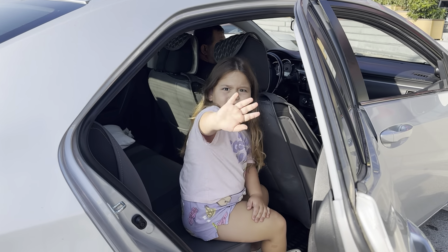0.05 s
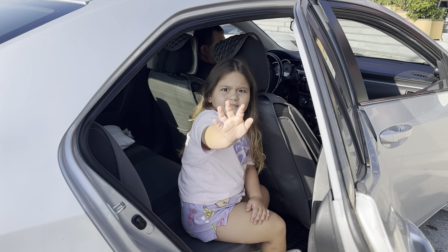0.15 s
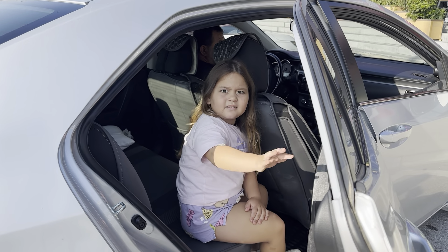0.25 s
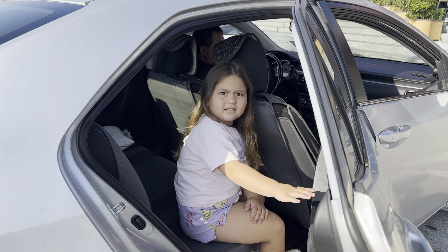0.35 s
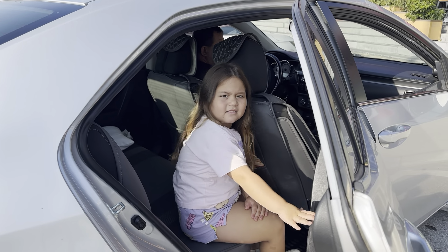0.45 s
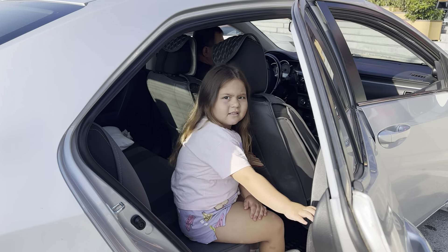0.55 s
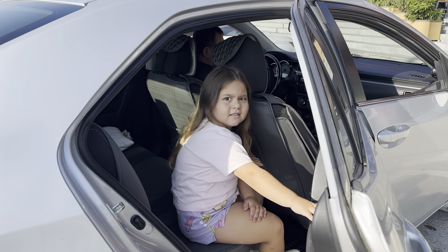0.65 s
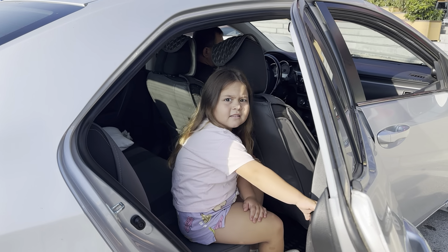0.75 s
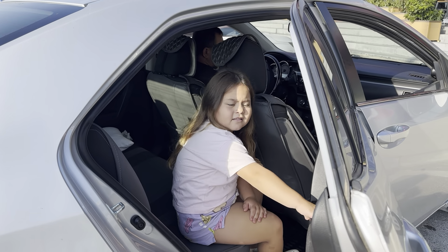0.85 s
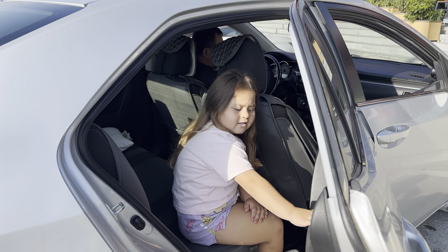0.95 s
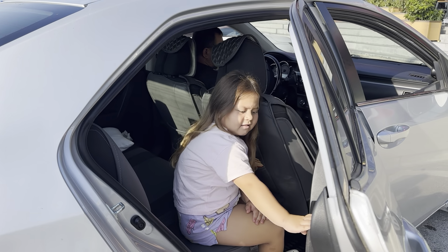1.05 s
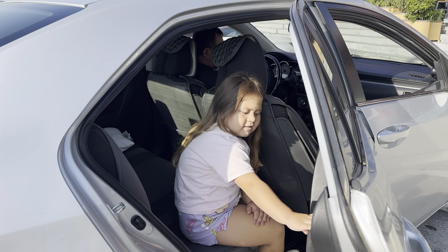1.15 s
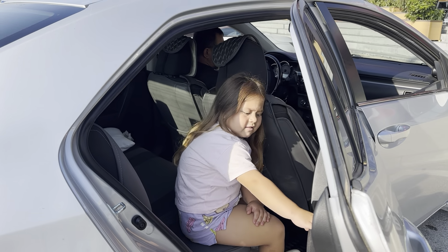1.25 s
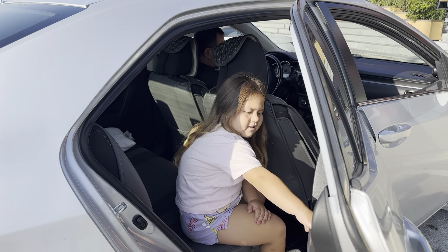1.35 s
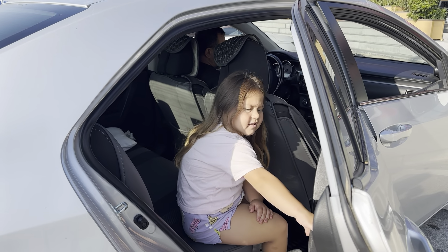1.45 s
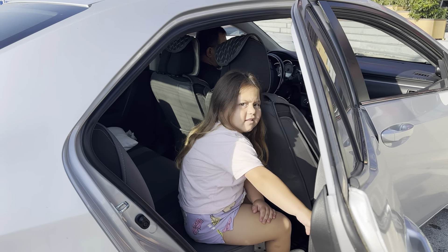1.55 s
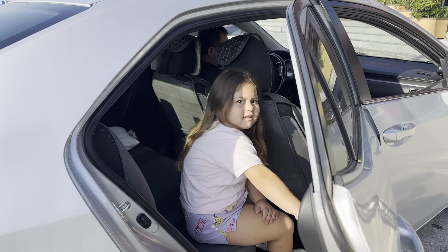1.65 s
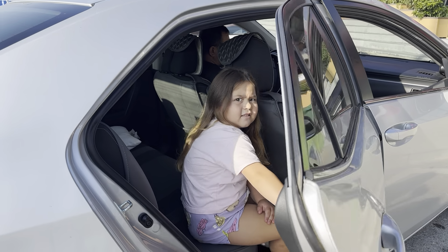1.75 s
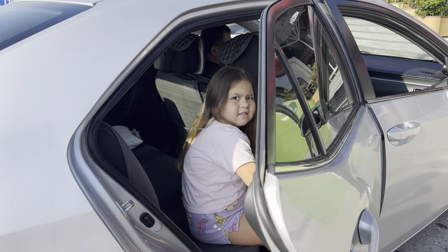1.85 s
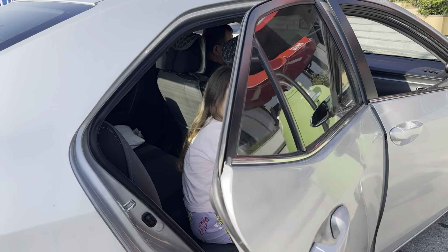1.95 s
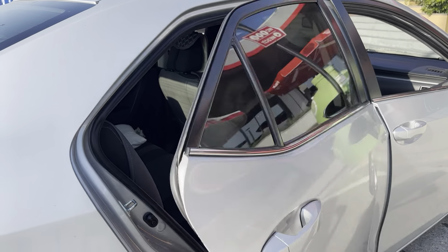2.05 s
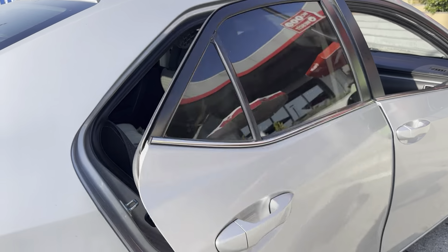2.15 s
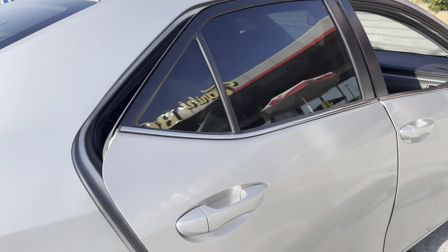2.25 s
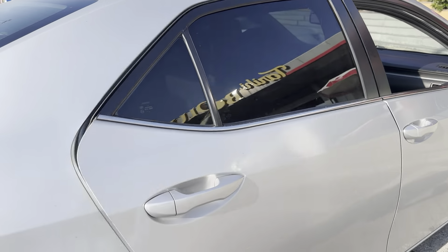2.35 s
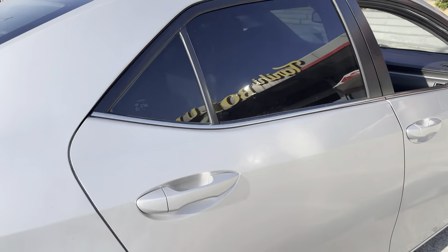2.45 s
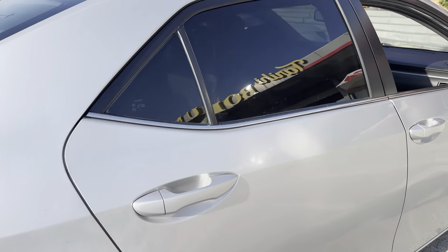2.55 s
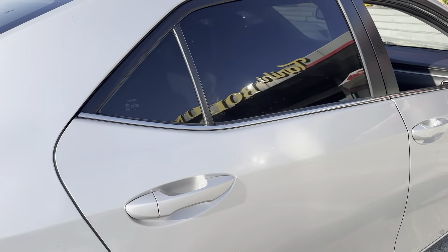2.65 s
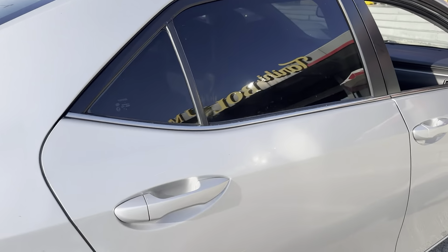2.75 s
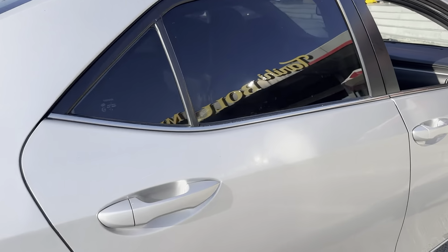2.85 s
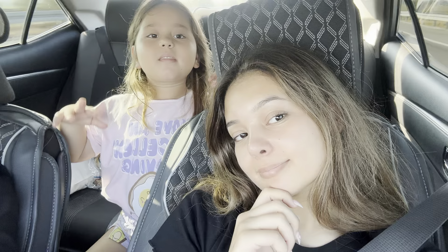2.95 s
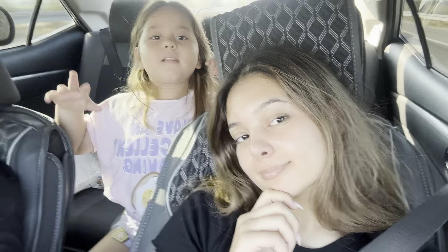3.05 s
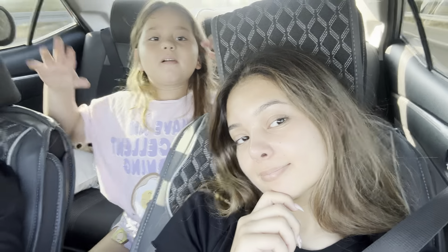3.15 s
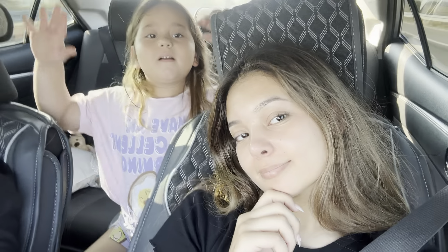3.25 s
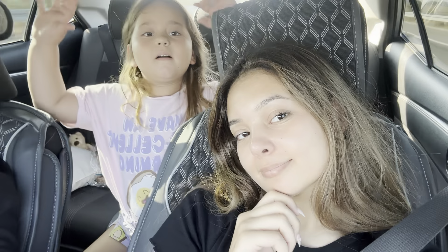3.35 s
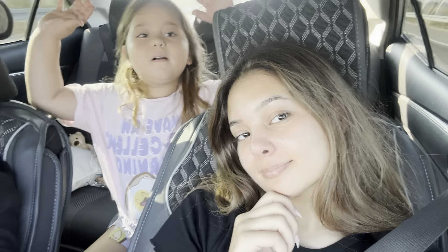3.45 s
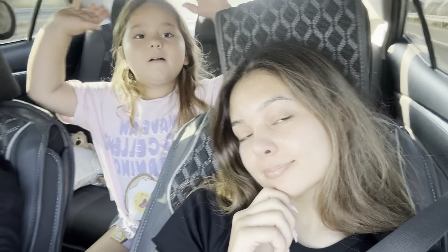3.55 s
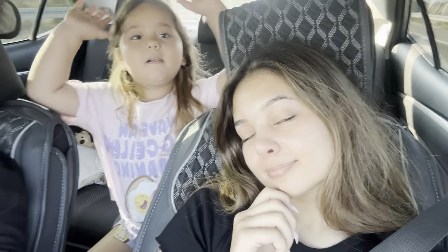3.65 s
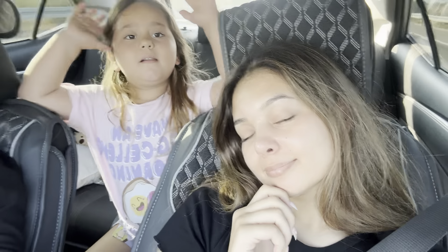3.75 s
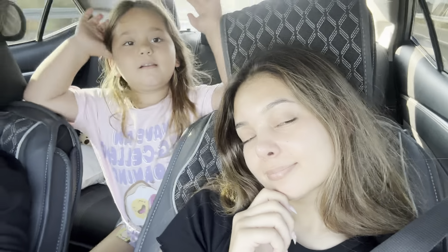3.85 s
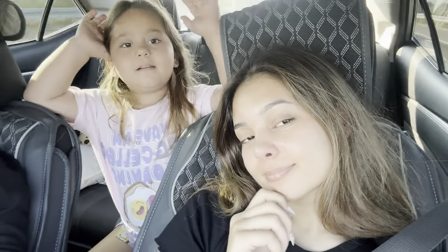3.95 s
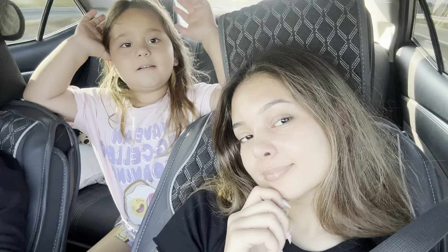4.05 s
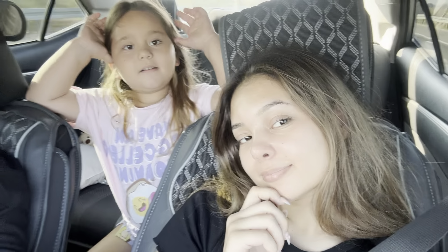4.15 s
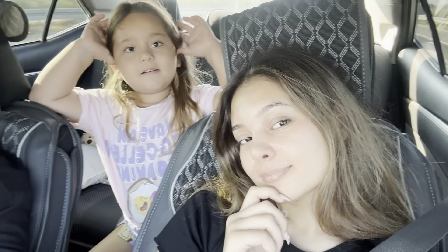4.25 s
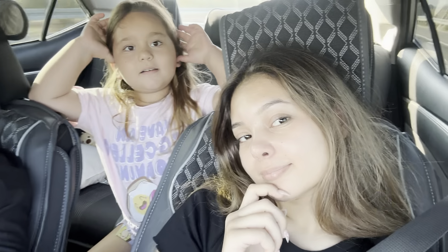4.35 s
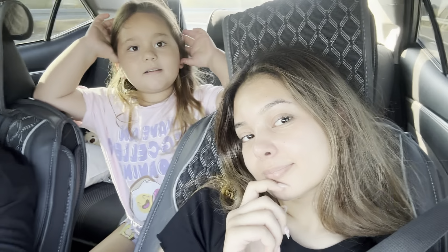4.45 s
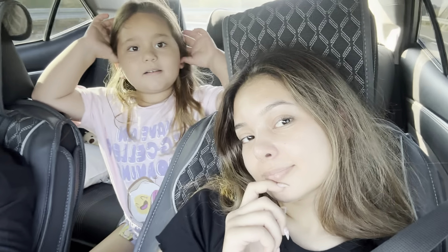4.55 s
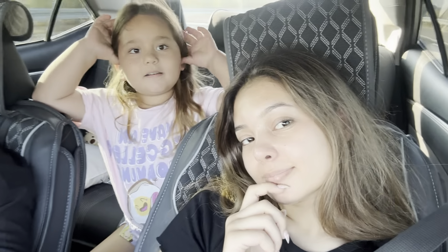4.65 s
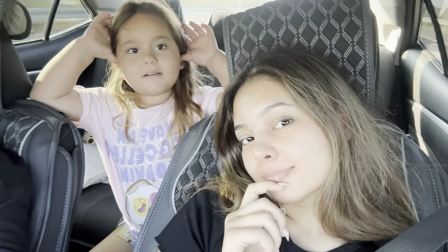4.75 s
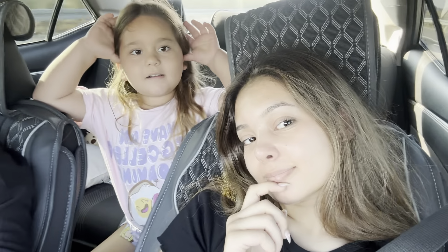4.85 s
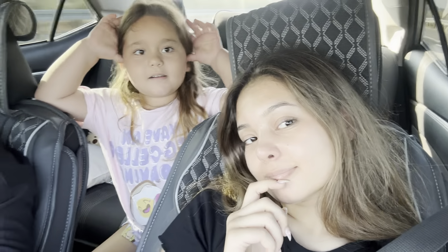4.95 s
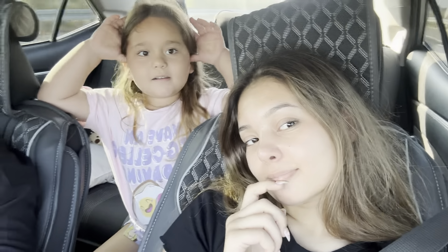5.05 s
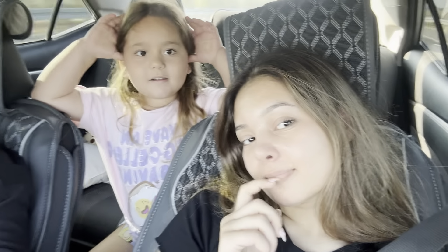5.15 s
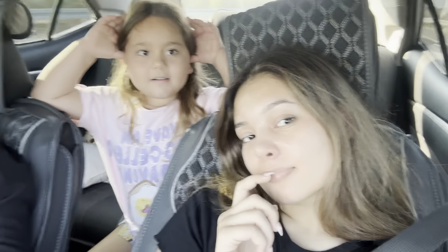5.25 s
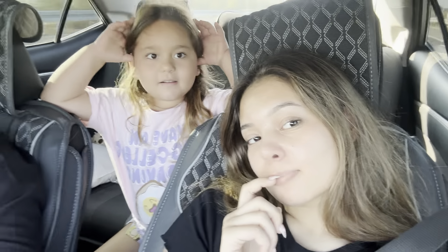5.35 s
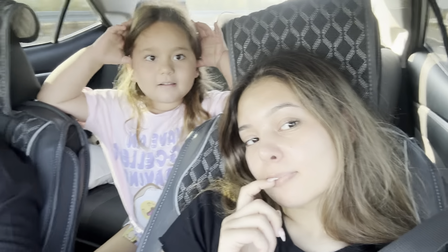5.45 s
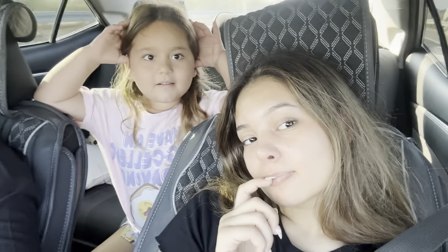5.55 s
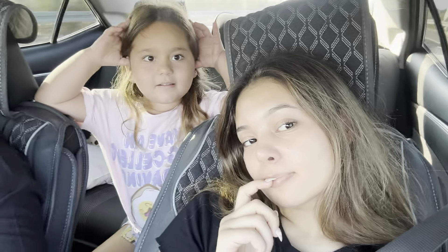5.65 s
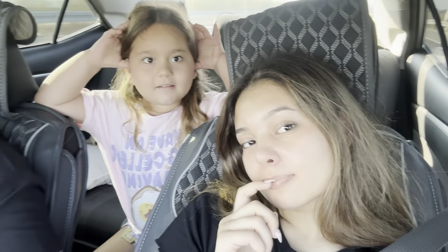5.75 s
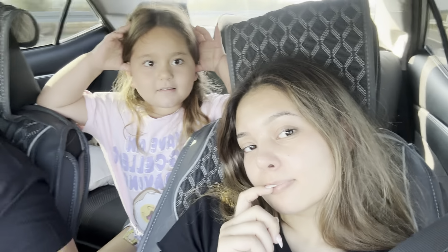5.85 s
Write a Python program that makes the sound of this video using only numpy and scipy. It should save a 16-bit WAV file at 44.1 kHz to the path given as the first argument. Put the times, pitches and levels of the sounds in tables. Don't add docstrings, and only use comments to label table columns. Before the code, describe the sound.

Open-air stereo beside a car: low wind buffeting at first, then a subdued background of far traffic and airy machinery. Small dry clicks lead to a close, dense metal-and-rubber door thud, dying quickly. About half a second later the sound jumps inside the cabin, much louder and continuously bass-heavy, with low engine drone, irregular floor thumps, tyre rumble and soft window wind until the end.

```python
import sys
import numpy as np
from scipy import signal
from scipy.fft import rfft, irfft, next_fast_len
from scipy.io import wavfile
from scipy.ndimage import uniform_filter1d

SR = 44100
rng = np.random.default_rng(int(sys.argv[2]) if len(sys.argv) > 2 else 0)


def convert_level_to_amplitude(level_db):
    exponent = np.asarray(level_db, float) / 20
    return 10 ** exponent


def master_out(mix):
    frames = np.transpose(np.atleast_2d(mix))
    ceiling = np.clip(frames, -1, 1)
    pcm = np.round(ceiling * 32767).astype(np.int16)
    wavfile.write(sys.argv[1], SR, pcm)


N = 259647
T = np.arange(N) / SR
CUT_S = 3.0362

# hz, level_db_per_hz
RUMBLE_SPECTRUM = [(15, -49), (25, -15), (59, 5), (92, 5), (336, -16.5), (377, -12.5), (400, -39),
                   (520, -57), (880, -120)]
# hz, level_db_per_hz
TRAFFIC_SPECTRUM = [(120, 5), (200, -4), (339, -8), (373, -11.5), (471, -1), (512, -9.5), (936, -6.5),
                    (2500, -21.5), (3250, -34.5), (5500, -120)]
# hz, level_db_per_hz
FAR_HISS_SPECTRUM = [(1500, -7), (2500, -3), (3500, 3.5), (4400, 6.5), (5500, 2), (7500, 0.5), (9500, 2),
                     (12000, -13.5), (15500, -5.5), (17000, -35.5)]
# pitch_hz, width_hz, level_db
YARD_TONES = [(496, 200, -63), (817, 51, -63.5), (1535, 29, -62), (4190, 200, -71.5), (4680, 59, -68.5)]
# hz, share
OUTDOOR_LIKENESS = [(60, 0.93), (240, 0.76), (480, 0.4), (950, 0.021), (1900, 0.11), (3800, 0.59),
                    (7500, 0.31)]
# time_s, level_db
BREEZE = [
    (0.0, -28),
    (0.13, -40.5),
    (1.33, -40),
    (2.01, -44),
    (2.3, -42),
    (2.76, -46.5),
    (2.93, -42),
]
# centre_s, peak_db, pitch_hz
GUSTS = [(.012, -24, 185), (0.022, -17.5, 196), (.029, -16, 123), (.045, -20, 59), (.113, -23.5, 87),
         (0.16, -19.5, 138), (.235, -30.5, 55), (.3, -33, 60), (.42, -23, 92), (.745, -30, 71),
         (1.2, -35.5, 250), (1.238, -23.5, 100), (1.613, -36, 70), (2.26, -32, 75), (2.335, -33, 55),
         (2.78, -37, 42), (2.88, -27, 70)]

# hz, level_db_per_hz
BOOM_SPECTRUM = [(12, -44), (20, -17), (43, 1), (97, 1), (145, -1.5), (189, -3.5), (216, -20.5),
                 (271, -18.5), (300, -23), (390, -34), (660, -120)]
# hz, level_db_per_hz
ROAR_SPECTRUM = [(130, -39), (220, 1), (278, -0.5), (308, 2), (653, -2.5), (1360, -14.5), (1720, -20),
                 (1880, -25), (2190, -27.5), (2500, -33.5), (3250, -64.5), (5500, -120)]
# hz, level_db_per_hz
WIND_SPECTRUM = [(1300, -21.5), (2000, -13.5), (2800, -7.5), (4000, -11), (5500, -15.5), (7500, -21),
                 (9500, -24.5), (12000, -32.5), (14500, -40.5), (15800, -50)]
# pitch_hz, width_hz, level_db
CABIN_TONES = [(58, 30, -27), (110.7, 12, -25.5), (197, 18, -50.5), (242.7, 9, -41), (307.5, 15, -45),
               (484, 31, -56.5), (931, 150, -44.5), (3830, 800, -65), (1417, 6.7, -56)]
# pitch_hz, width_hz, level_db
LEAK = [(11800, 3100, -77.5)]
# hz, share
CABIN_LIKENESS = [(60, 1), (130, 0.92), (240, 0.76), (480, 0.17), (1000, 0.56), (2000, 0.2), (4000, 0.18),
                  (8000, 0.021)]
# centre_s, peak_db, pitch_hz
JOINTS = [(3.042, -6, 104), (3.087, -8, 105), (3.196, -8.5, 109), (3.302, -10, 91), (3.379, -10.5, 112),
          (3.475, -7.5, 101), (3.711, -14, 109), (3.766, -5, 123), (3.884, -5.5, 111), (4.067, -9.5, 116),
          (4.142, -10, 89), (4.293, -5, 132), (4.356, -12, 109), (4.54, -12.5, 95), (4.743, -12, 84),
          (4.796, -17, 103), (4.882, -7, 110), (5.011, -4, 95), (5.203, -9, 98), (5.235, -11, 115),
          (5.298, -9, 109), (5.342, -10, 95), (5.449, -4.5, 100), (5.587, -8, 104), (5.655, -7.5, 70),
          (5.865, -8, 82)]
# time_s, level_db
ROAD = [
    (3.1, 1.2),
    (3.9, 1.85),
    (4.3, 0.2),
    (4.8, 2.2),
    (5.45, 1.7),
    (5.85, 3),
]
# time_s, level_db
AIRFLOW = [
    (3.1, 1.7),
    (3.8, 0),
    (4.3, 1),
    (4.7, 1.8),
    (5.05, 2),
    (5.3, 1),
    (5.85, 2.3),
]
# time_s, firing_hz
SPEED = [
    (3.1, 92.2),
    (4.0, 92),
    (5.0, 94.43),
    (5.85, 94.35),
]
# time_s, level_db
FIRING_LOAD = [(3.1, -21.5), (3.3, -15.5), (3.55, -21), (3.8, -16), (3.97, -24), (4.15, -18), (4.4, -15.5),
               (4.6, -21), (4.78, -20.5), (5.03, -16.5), (5.2, -21), (5.45, -15.5), (5.62, -17),
               (5.85, -16.5)]
CRUISE_HZ, DB_PER_HZ = 92.1, 0.42

# pitch_hz, width_hz, level_db
CASE = [(3100, 1500, 20), (9500, 3000, 8), (15200, 1500, 13)]
# peak_s, peak_db
RUBS = [
    (1.218, -42.5),
    (1.295, -61),
]
# start_s, peak_db
SNAPS = [
    (2.4442, -24),
    (2.4468, -20.5),
    (2.4505, -30),
    (2.849, -54),
]
# pitch_hz, width_hz, level_db, t60_s
SNAP_BODY = [(3440, 860, -3.5, 0.031), (9800, 9100, 3.5, 0.015), (14700, 3200, -3, 0.02)]
# start_s, peak_db
SLIPS = [
    (1.5456, -33),
    (1.5535, -38),
    (1.5558, -42),
    (1.5578, -37),
    (1.5595, -38),
    (1.5655, -39),
    (1.5742, -36),
    (1.579, -44),
    (1.587, -45),
    (1.592, -44),
]
# pitch_hz, width_hz, level_db, t60_s
SPRING_BODY = [(3820, 690, 4, 0.02), (4870, 900, -6, 0.024), (6300, 970, -2, 0.034),
               (9200, 3300, -11, 0.089)]
# start_s, peak_db
KNOCKS = [
    (1.5607, -21),
    (1.5635, -30),
    (1.5677, -30),
    (1.5755, -36),
]
# pitch_hz, width_hz, level_db, t60_s
HINGE_BODY = [(503, 220, -1, 0.025), (293, 140, -10.5, 0.19), (1210, 1100, -12.5, 0.1),
              (3880, 1900, -19.5, 0.37)]
# start_s, peak_db
SETTLES = [
    (2.4465, -20),
    (2.455, -22),
    (2.4605, -21),
    (2.4715, -29),
    (2.4925, -29),
    (2.4965, -26),
    (2.515, -36),
]
# pitch_hz, width_hz, level_db, t60_s
PAWL_BODY = [(925, 350, -1, 0.027), (1400, 330, -2, 0.03), (1830, 500, -6, 0.023)]

# start_s, level_db
SEAL_HITS = [
    (2.4125, -19),
    (2.4175, -8.5),
    (2.453, -12.5),
]
# start_s, level_db
LATCH_HITS = [
    (2.4079, -29),
    (2.4229, -13.5),
    (2.4252, -14.5),
    (2.4271, -7.5),
    (2.441, -23.5),
    (2.449, -20),
    (2.457, -29),
]
# start_s, level_db
FRAME_HITS = [
    (2.4456, -6),
    (2.454, -13.5),
    (2.4645, -22),
    (2.482, -23),
    (2.492, -19),
    (2.511, -38),
]
# hz, level_db
SEAL_COLOUR = [(150, -34), (250, -27), (400, -2), (600, 3.5), (800, -11), (1150, -13.5), (7000, -31)]
# hz, level_db
LATCH_COLOUR = [(150, -19), (230, -10), (380, -5.5), (750, -3), (1150, 0.5), (1600, -3.5), (7000, -15.5)]
# hz, level_db
FRAME_COLOUR = [(60, 8), (150, -3), (280, -3), (480, -15.5), (1150, -21.5), (3000, -24), (8000, -30.5)]
# pitch_hz, level_db, t60_s
DOOR_MODES = [(59, -14, 0.22), (91, -14, 0.098), (144, -14, 0.18), (182, -13, 0.21), (230, -4, 0.22),
              (269, -6, 0.08), (316.3, -4.5, 0.25), (333, 8.5, 0.043), (408.5, -4, 0.14), (460, 7, 0.068),
              (555, -1, 0.019), (596, -5, 0.054), (770, -28.5, 0.0087), (864, 7, 0.0085),
              (992, -1.5, 0.048), (1057, -0.5, 0.035), (1306, 2, 0.038), (1363, -7, 0.013),
              (1580, -5.5, 0.016), (1680, -12, 0.027), (2296, 1.5, 0.038)]
# hz, level_db_per_hz
SHUDDER_SPECTRUM = [(60, 9), (250, 2.5), (550, -7.5), (1000, -8.5), (3000, -13.5), (8000, -15.5),
                    (16000, -28)]
# hz, t60_s
SHUDDER_T60 = [(60, 0.46), (300, 0.46), (1400, 0.27), (4000, 0.2), (8000, 0.18)]
# centre_s, peak_db, pitch_hz
PUFFS = [(2.4465, -5, 85), (2.449, -10, 52), (2.4527, 0, 230), (2.458, -8.5, 180), (2.4657, -2.5, 140),
         (2.4728, -6, 140), (2.479, -21, 150), (2.486, -11, 70), (2.5025, -13, 150), (2.508, -10, 200),
         (2.517, -13, 171), (2.533, -20, 110), (2.568, -21, 75)]
# centre_s, peak_db, pitch_hz
FLEXES = [
    (2.4105, -20, 330),
    (2.4142, -15, 350),
    (2.4195, -6, 450),
    (2.4245, -12.5, 520),
    (2.428, -4, 355),
    (2.4365, -12.5, 350),
    (2.4525, -12.5, 418),
    (2.4945, -15, 465),
]

# start_s, peak_db
CUT_CLICKS = [
    (3.0374, -33),
    (3.0568, -19.5),
    (3.0655, -40),
    (3.0755, -39),
]
# low_hz, high_hz, wander_hz
MID_GAPS = [(8250, 9550, 40), (12450, 14000, 350), (15830, 23000, 0)]
# low_hz, high_hz, wander_hz
SIDE_GAPS = [(10600, 12200, 200), (14650, 23000, 100)]
# low_hz, high_hz, wander_hz
CABIN_SIDE_GAP = (9000, 12400, 200)
# hz, share_of_usual_level
SPARSE = [(7500, .3), (9500, .8), (10300, 1.25), (13000, 1.35), (13600, 2.0), (14400, 2.8)]


def rms_one(x):
    return x / np.sqrt(np.mean(x ** 2) + 1e-20)


def tilt(db):
    return convert_level_to_amplitude(np.array([[-db], [db]]))


def in_time(rows):
    s, value = np.transpose(rows)
    return np.interp(T, s, value)


def bump(centre_s, width_s):
    return np.exp(-.5 * ((T - centre_s) / width_s) ** 2)


def at_hz(points, hz):
    point_hz, value = np.transpose(points)
    return np.interp(np.log(hz), np.log(point_hz), value)


def fft_grid():
    size = next_fast_len(N, real=True)
    return size, np.fft.rfftfreq(size, 1 / SR) + 1


def drift(rate_hz):
    r = np.exp(-80 * np.pi * rate_hz / SR)
    slow = signal.lfilter([1], [1, -2 * r, r * r], rng.standard_normal(N // 40 + 2002))[2000:]
    return np.interp(np.arange(N) / 40, np.arange(len(slow)), rms_one(slow))


def pair(alike, lag=0):
    size, hz = fft_grid()
    shared, left, right = rfft(rng.standard_normal((3, size)))
    share = np.clip(at_hz(alike, hz), 0, 1)
    late = np.exp(-2j * np.pi * hz * lag / SR)
    common = np.sqrt(share) * shared * [late, 1 + 0 * late]
    own = np.sqrt(1 - share) * np.array([left, right])
    return irfft(common + own, size)[:, :N]


def bands(white, spectrum):
    size, hz = fft_grid()
    coloured = rfft(white, size) * convert_level_to_amplitude(at_hz(spectrum, hz))
    low, high = spectrum[0][0], min(spectrum[-1][0], 16000)
    for centre in low * 2 ** np.arange(0, np.log2(high / low) + .5, .5):
        hump = np.cos(np.pi * np.clip(np.log2(hz / centre), -.5, .5)) ** 2
        yield centre, irfft(coloured * hump, size)[..., :N]


def wash(white, spectrum, patchy_db, rate_hz):
    together = drift(rate_hz)
    total = 0
    for hz, x in bands(white, spectrum):
        depth_db = patchy_db * (1 + 0.74 * (hz > 9000))
        flicker = 0.38 * together + drift(rate_hz * 2)
        total = total + convert_level_to_amplitude(depth_db * flicker) * x
    return rms_one(total)


def resonance(x, hz, width_hz):
    r = np.exp(-np.pi * width_hz / SR)
    poles = [1, -2 * r * np.cos(2 * np.pi * hz / SR), r * r]
    return signal.lfilter([(1 - r * r) / 2, 0, (r * r - 1) / 2], poles, x)


def ring(x, hz, width_hz):
    return resonance(resonance(x, hz, width_hz), hz, 2 * width_hz)


def tones(white, table):
    return sum(convert_level_to_amplitude(db) * rms_one(ring(white, hz, width_hz)) for hz, width_hz, db in table)


def dying(clicks, t60_s):
    return signal.lfilter([1], [1, -convert_level_to_amplitude(-60 / (t60_s * SR))], clicks + 1e-18)


def swings(rows, cycles):
    out = np.zeros(N)
    for s, db, hz in rows:
        u = np.clip(T - s, -.1, .1)
        envelope = np.exp(-.5 * (u * hz / cycles) ** 2)
        out += convert_level_to_amplitude(db) * envelope * np.cos(2 * np.pi * hz * u * (1 - 8 * u) - .6)
    return out


def yard():
    duck_s, duck_db, recover_s = 2.45, -2.5, 0.16
    passer_db = 1.3 * bump(2, 0.42)
    far_db = passer_db + duck_db * (T > duck_s) * np.exp((duck_s - T) / recover_s)
    white = pair(OUTDOOR_LIKENESS)
    rumble = convert_level_to_amplitude(in_time(BREEZE) + 1.5) * wash(white, RUMBLE_SPECTRUM, patchy_db=2.5, rate_hz=74)
    traffic = convert_level_to_amplitude(far_db - 43) * wash(white, TRAFFIC_SPECTRUM, patchy_db=1.0, rate_hz=19)
    hiss = convert_level_to_amplitude(far_db - 51.5) * wash(white, FAR_HISS_SPECTRUM, patchy_db=2.0, rate_hz=31)
    return rumble + traffic + hiss + tones(white, YARD_TONES)


def gusts():
    return swings(GUSTS, cycles=0.65) * tilt(1.)


def road_and_wind():
    boom_db = -16 + DB_PER_HZ * (in_time(SPEED) - CRUISE_HZ)
    white = pair(CABIN_LIKENESS, lag=16)
    boom = convert_level_to_amplitude(boom_db - 0.5) * wash(white, BOOM_SPECTRUM, patchy_db=2.0, rate_hz=9)
    roar = convert_level_to_amplitude(in_time(ROAD) - 27) * wash(white, ROAR_SPECTRUM, patchy_db=0.9, rate_hz=5)
    hiss = convert_level_to_amplitude(in_time(AIRFLOW) - 51) * wash(white, WIND_SPECTRUM, patchy_db=0.93, rate_hz=8.1)
    leak = bump(4.6, 0.33) * tones(white, LEAK)
    cavity = convert_level_to_amplitude(boom_db + 14.0) * tones(white, CABIN_TONES)
    return boom - swings(JOINTS, cycles=0.51) + roar + hiss + leak + cavity


def engine():
    firing_hz = in_time(SPEED) * (1 + 0.0097 * drift(5.5))
    turn = 2 * np.pi * np.cumsum(firing_hz) / SR
    firing_db = 1.5 + in_time(FIRING_LOAD) + 0.55 * drift(3.8)
    second_db = -24.5 - 2 * (1 + np.tanh((T - 4.5) / .2)) / 2
    firing = convert_level_to_amplitude(firing_db) * np.sin(turn)
    second = convert_level_to_amplitude(second_db) * np.sin(2 * turn + 1.39)
    tyre = convert_level_to_amplitude(-40.5) * np.sin(turn * 245.5 / CRUISE_HZ)
    return firing + second + tyre


def case_tick():
    tick = convert_level_to_amplitude(-33) * (np.arange(N) == int(1.0327 * SR)) + 1e-18
    tick = 0.4 * tick + sum(convert_level_to_amplitude(db) * resonance(tick, hz, width_hz) for hz, width_hz, db in CASE)
    return signal.sosfilt(signal.cheby2(10, 60, 16100, fs=SR, output="sos"), tick)


def dry_contacts():
    white = pair([(300, 0.76), (8000, 0.19)])
    out = np.zeros((2, N))
    for events, body in [(SNAPS, SNAP_BODY), (SLIPS, SPRING_BODY), (KNOCKS, HINGE_BODY), (SETTLES, PAWL_BODY)]:
        s, peak_db = np.transpose(events)
        clicks = np.zeros(N)
        clicks[(s * SR).astype(int)] = convert_level_to_amplitude(peak_db - 6.0)
        for hz, width_hz, db, t60_s in body:
            struck = resonance(resonance(clicks, hz, width_hz / 2), hz, 2 * width_hz)
            out += convert_level_to_amplitude(db + 1) * struck * SR / (np.pi * width_hz / 2)
            out += convert_level_to_amplitude(db) * dying(clicks, t60_s) * rms_one(ring(white, hz, width_hz))
    rise_db_per_s, fall_db_per_s = 394, 225
    rubbed = 0
    for s, db in RUBS:
        rubbed = rubbed + convert_level_to_amplitude(db - np.maximum(rise_db_per_s * (s - T), fall_db_per_s * (T - s)))
    rustle = rms_one(resonance(white, 9400, 1000)) + 0.38 * rms_one(resonance(white, 6900, 1500))
    return out + rubbed * rustle


def door():
    kinds = [(SEAL_HITS, SEAL_COLOUR), (LATCH_HITS, LATCH_COLOUR), (FRAME_HITS, FRAME_COLOUR)]
    rows = [(s, db, colour) for hits, colour in kinds for s, db in hits]
    at = np.array([int(s * SR) for s, _, _ in rows])

    def blows(hz, extra_db):
        clicks = np.zeros(N)
        np.add.at(clicks, at, convert_level_to_amplitude([db + at_hz(colour, hz) for _, db, colour in rows] + extra_db))
        soft = np.exp(-7.5 * hz / SR)
        return signal.lfilter([(1 - soft) ** 2], [1, -2 * soft, soft ** 2], clicks + 1e-18)

    modes = np.zeros(N)
    for hz, db, t60_s in DOOR_MODES:
        w = 2 * np.pi * hz / SR
        r = convert_level_to_amplitude(-60 / (t60_s * SR))
        drive = [.5, 0, -.5] if hz > 300 else [0, np.sin(w)]
        struck = blows(hz, db + 4 * rng.standard_normal(len(at)))
        modes += signal.lfilter(drive, [1, -2 * r * np.cos(w), r * r], struck + 1e-18)

    shaken = 0
    white = pair([(100, 1.0), (1400, 0.18), (6000, 0.98)])
    for hz, x in bands(white, SHUDDER_SPECTRUM):
        struck = blows(hz, np.zeros(len(at)))
        long_tail = dying(struck, at_hz(SHUDDER_T60, hz)) * convert_level_to_amplitude(-2.5)
        crack = dying(struck, 0.023) * convert_level_to_amplitude(-14.5) * (hz > 1500) / np.sqrt(np.mean(x ** 2))
        shaken = shaken + x * (long_tail + crack)

    blow = signal.sosfilt(signal.butter(2, 38, "high", fs=SR, output="sos"), modes + shaken)
    return (blow - swings(PUFFS, cycles=0.27) - swings(FLEXES, cycles=0.85)) * tilt(.7)


def one_top(x):
    size, hz = fft_grid()
    left, right = rfft(x, size)
    turned = left * np.exp(2j * np.pi * (hz - 11300) / 4200)
    return irfft([left, np.where(hz > 8100, turned, right)], size)[:, :N]


def drop_weak_bands(x, mid_gaps, side_gaps, sparse_to_hz):
    mid_side = [x[0] + x[1], x[0] - x[1]]
    hz, _, both = signal.stft(mid_side, SR, nperseg=2048, boundary="even", padded=False)
    top_db = 10 * np.log10(np.sum(np.abs(both[:, hz > 8000]) ** 2, axis=(0, 1)) + 1e-20)
    hz_per_db, most_hz = 45, 400
    keep_hz = np.clip(hz_per_db * (top_db - np.median(top_db) + 1), 0, most_hz)
    usual = uniform_filter1d(np.median(np.abs(both), axis=2), size=24)
    floor = usual * at_hz(SPARSE, hz + 1) * (hz < sparse_to_hz)
    kept = np.abs(both) >= floor[..., None]
    for k, gaps in enumerate([mid_gaps, side_gaps]):
        for low, high, wander in gaps:
            shift = wander * np.round(2 * uniform_filter1d(rng.standard_normal((2, len(keep_hz))), size=3))
            below = hz[:, None] < low + shift[0] + keep_hz * (wander > 50)
            above = hz[:, None] > high + shift[1] - keep_hz
            kept[k] &= below | above
    mid, side = signal.istft(both * kept, SR, nperseg=2048)[1] / 2
    return np.hstack([[mid + side, mid - side], x[:, len(mid):]])


def scene():
    outside = (yard() + dry_contacts()) * tilt(1.1) + gusts() + door()
    outside = drop_weak_bands(one_top(outside), MID_GAPS, SIDE_GAPS, sparse_to_hz=13500)
    outside += case_tick()
    inside = (road_and_wind() + engine()) * tilt(-.2)
    cabin_side_gaps = [CABIN_SIDE_GAP, (15800, 23000, 0)]
    inside = drop_weak_bands(inside, [(14300, 23000, 0)], cabin_side_gaps, sparse_to_hz=14400)
    cut_clicks = np.zeros(N)
    for s, db in CUT_CLICKS:
        cut_clicks[int(s * SR)] = convert_level_to_amplitude(db)
    fade_in = np.clip((T - CUT_S) / 0.0031, 0, 1)
    return np.where(T < CUT_S, outside, fade_in * inside) + signal.lfilter([1], [1, -.6], cut_clicks)


def low_pass(x):
    return signal.sosfilt(signal.butter(12, 16690, fs=SR, output="sos"), x)


def record(dry):
    high_pass = signal.butter(2, 24, "high", fs=SR, output="sos").repeat(2, axis=0)
    heard = signal.sosfilt(high_pass, dry)
    mix = 1.163 * np.tanh(heard / 1.196)
    return low_pass(mix)


dry = scene()
out = record(dry)
master_out(out)
```